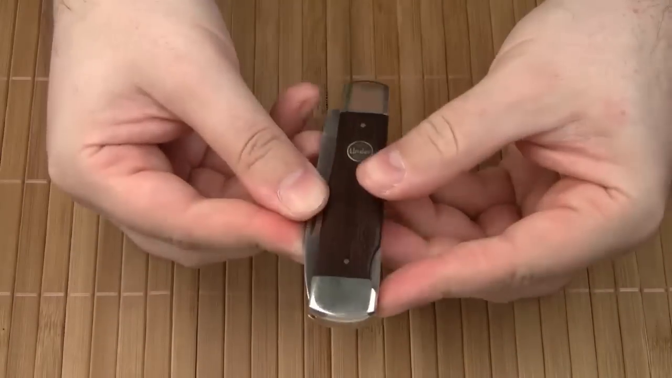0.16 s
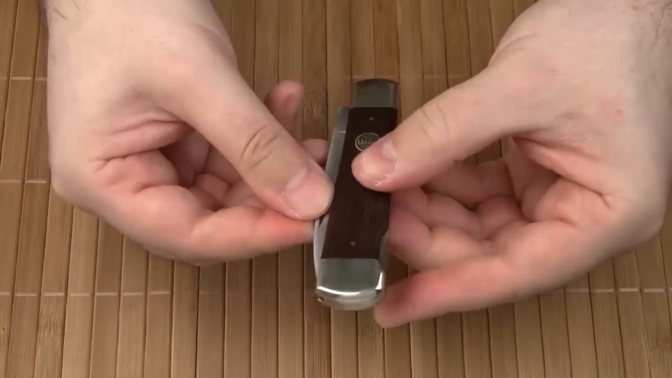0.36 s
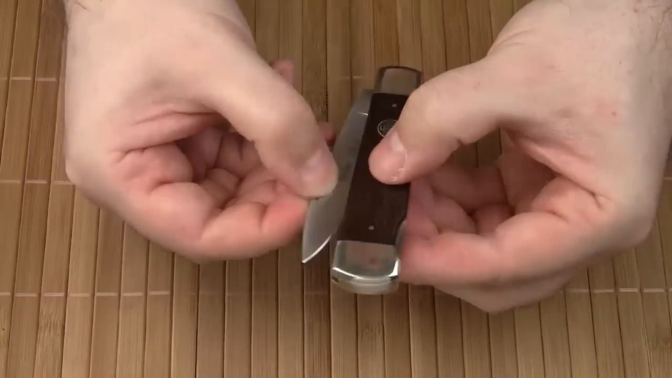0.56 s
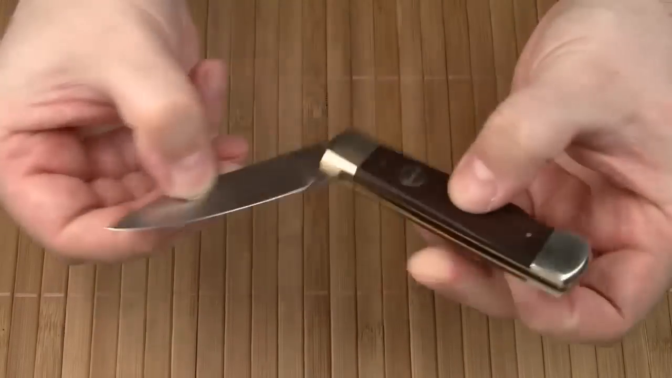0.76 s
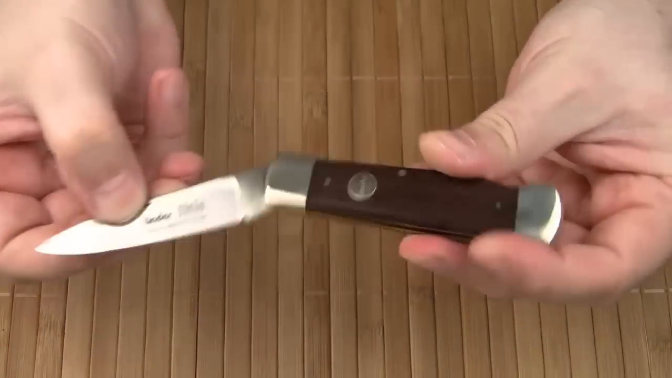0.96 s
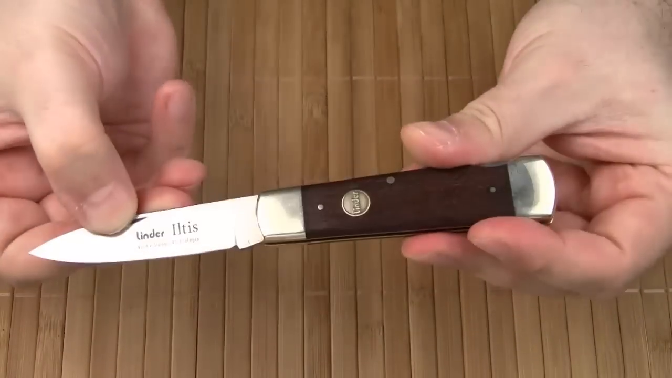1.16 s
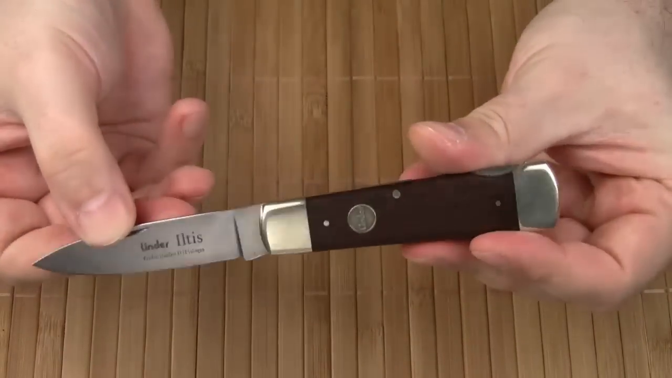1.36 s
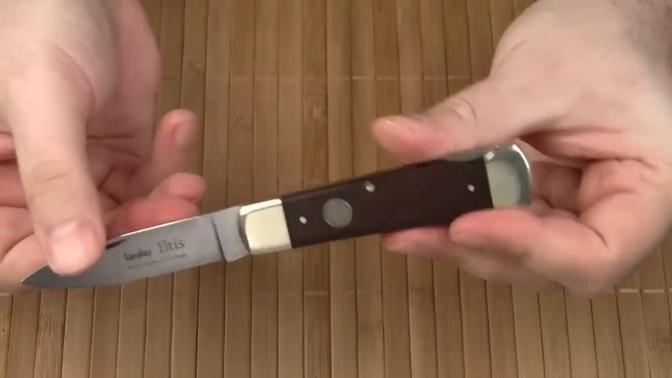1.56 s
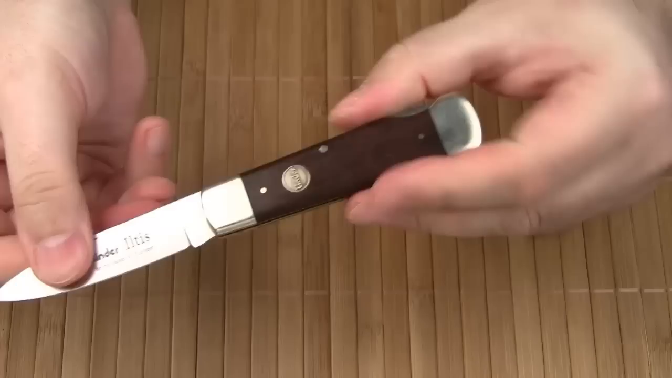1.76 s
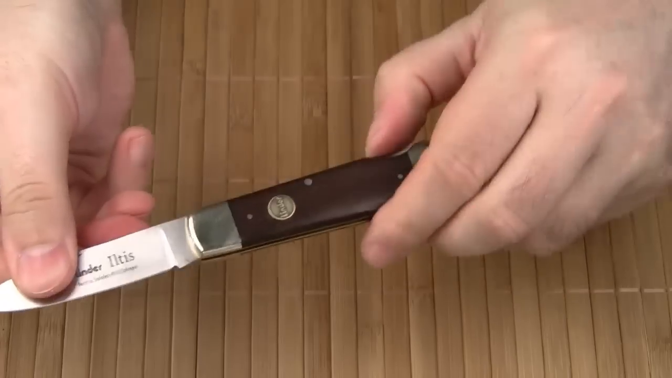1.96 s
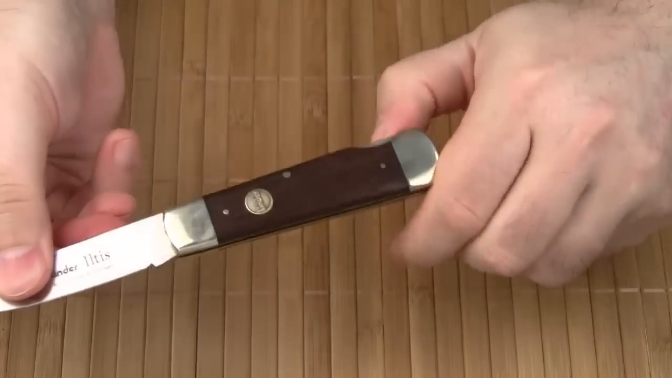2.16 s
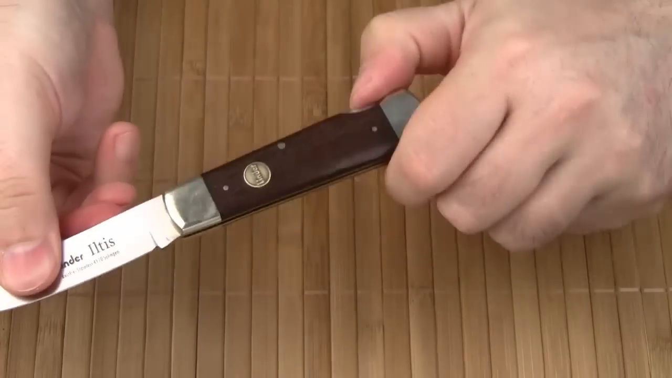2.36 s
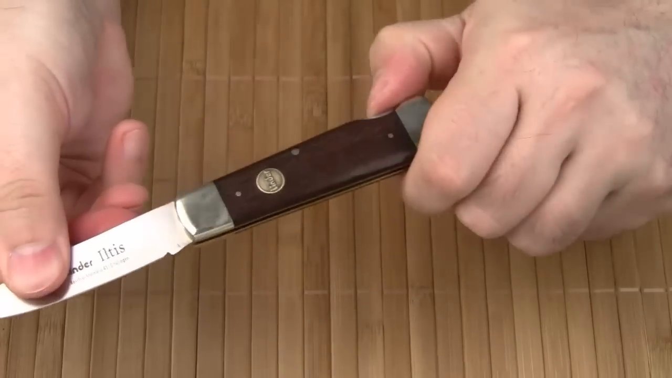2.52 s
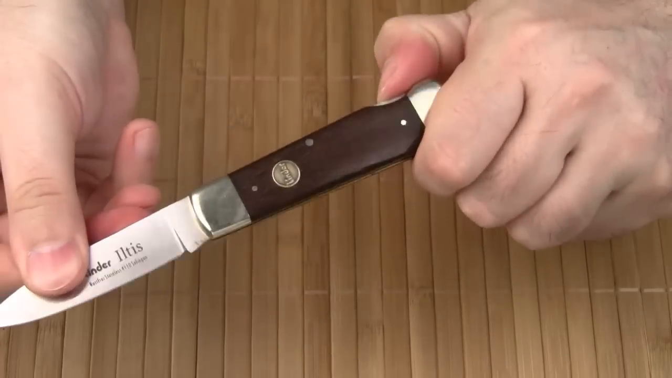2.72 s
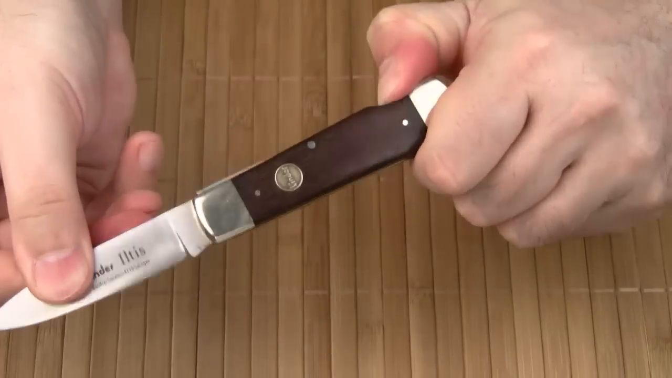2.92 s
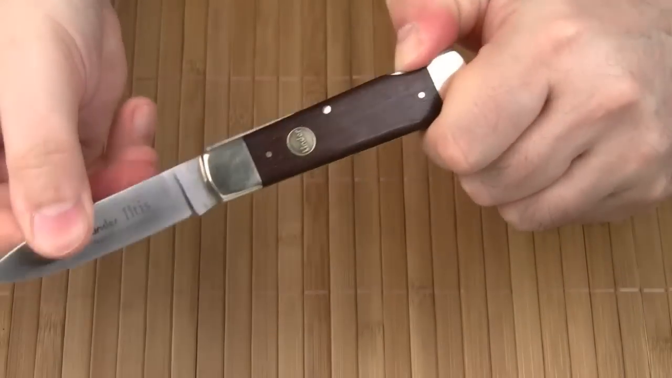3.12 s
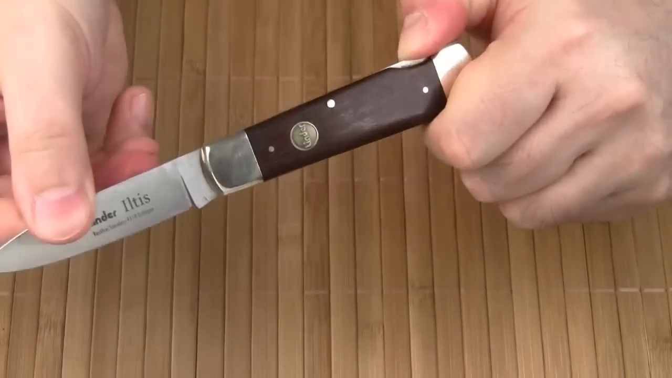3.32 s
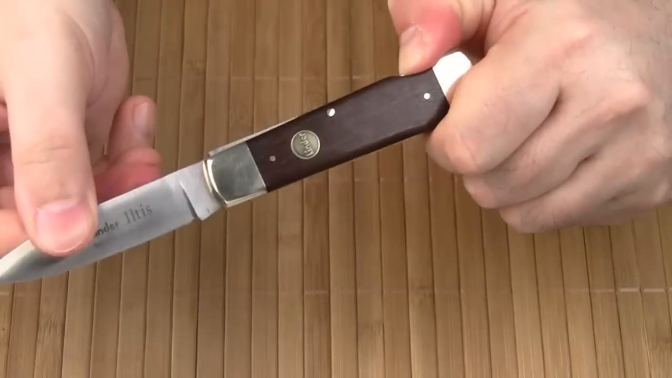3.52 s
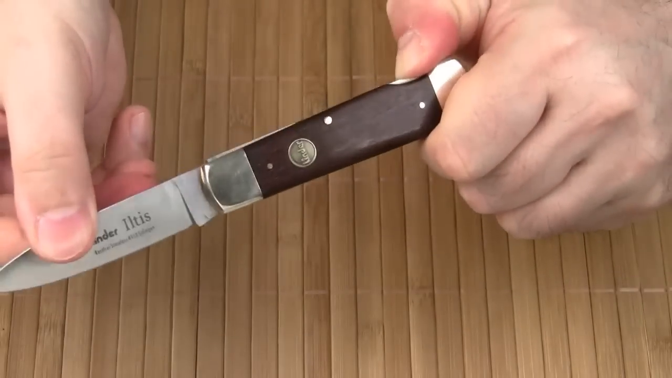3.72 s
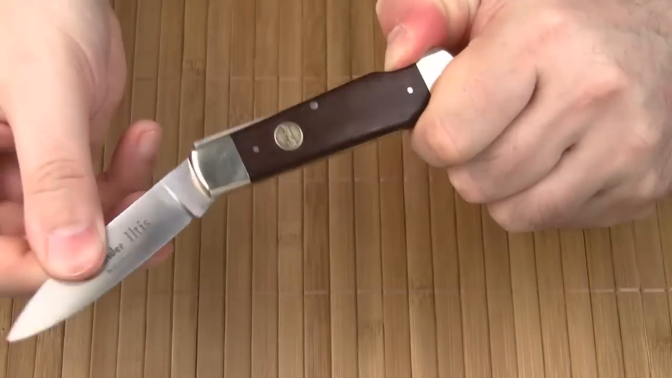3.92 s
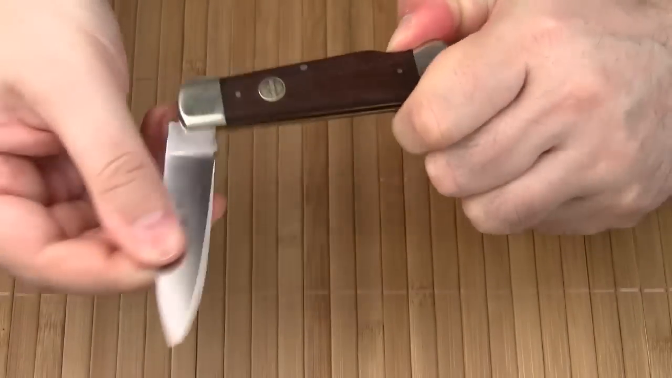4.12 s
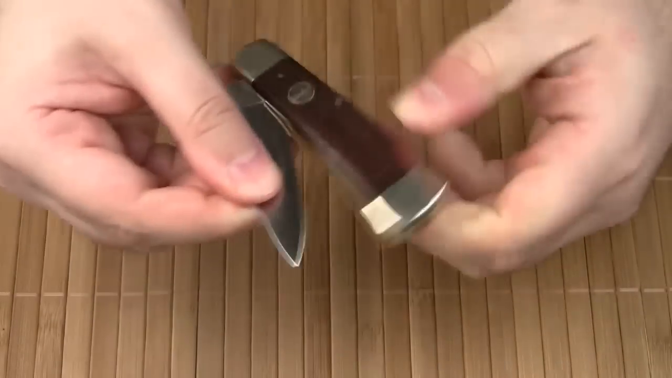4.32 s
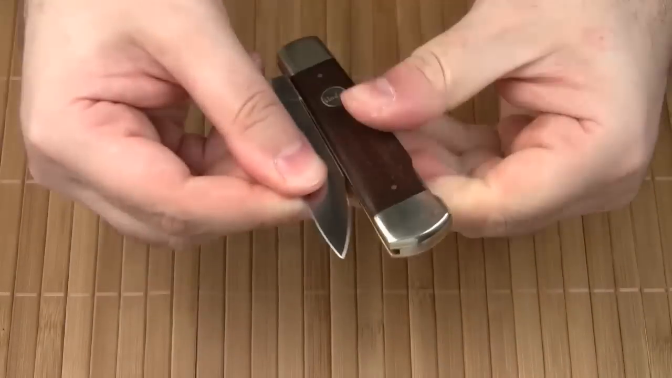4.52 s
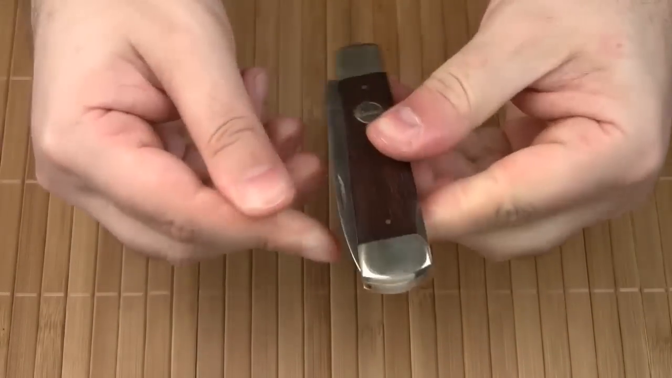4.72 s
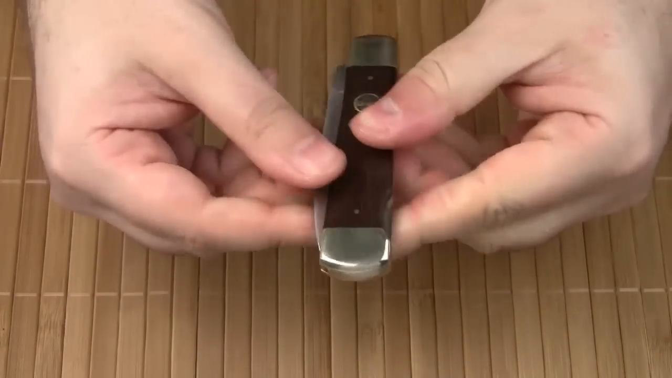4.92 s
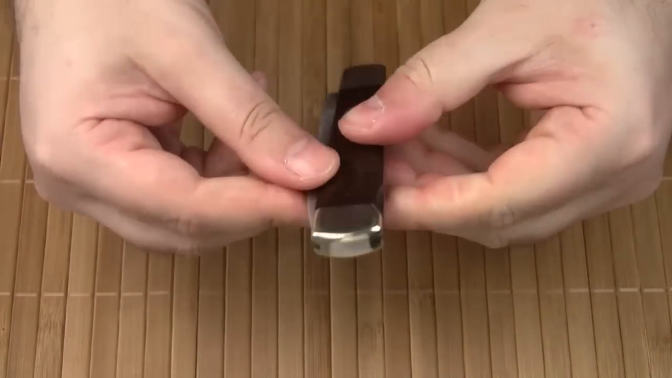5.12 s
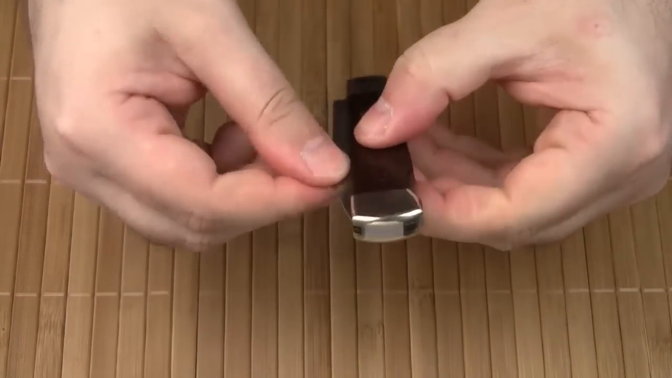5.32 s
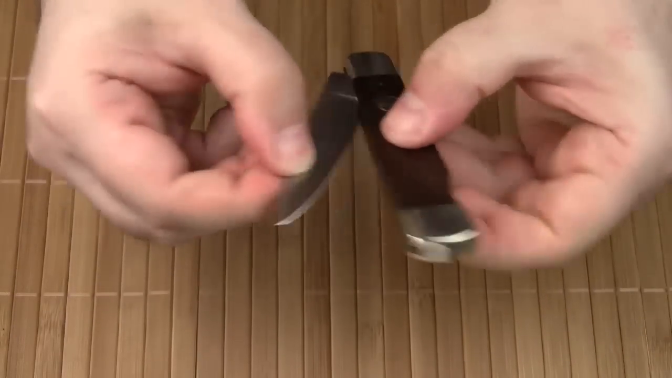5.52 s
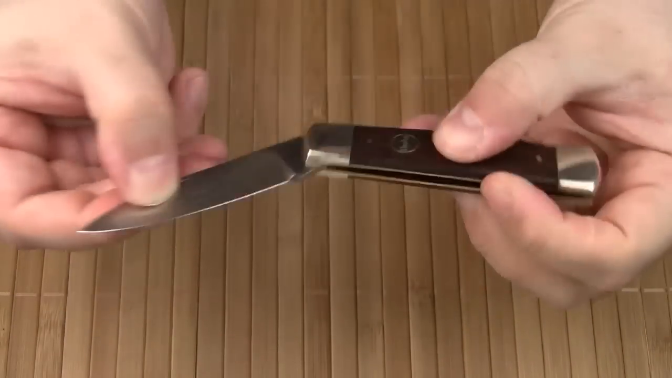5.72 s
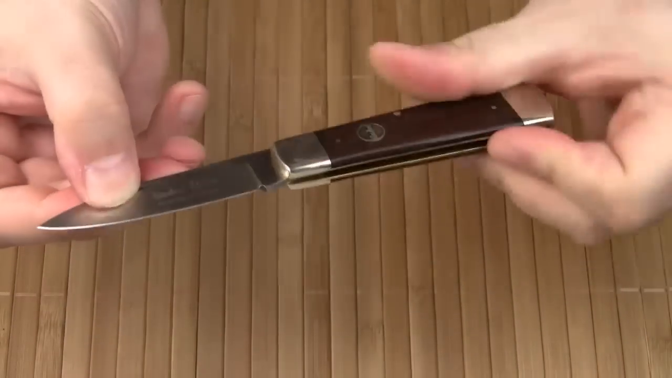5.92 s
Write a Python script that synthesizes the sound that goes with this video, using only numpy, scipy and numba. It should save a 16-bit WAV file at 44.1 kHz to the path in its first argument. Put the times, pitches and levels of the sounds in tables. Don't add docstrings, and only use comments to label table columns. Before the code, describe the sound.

Hands handle a pocket knife very close to a stereo microphone. A nail stutters faintly, then the blade locks open with a bright, overloaded snap. Three small lock ticks follow, the blade claps shut more softly, fingers fidget, a faint pivot squeak sounds, and a second loud snap locks it open. A small room answers each click over low hum, rumble and hiss.

```python
import sys
import numpy as np
from scipy import signal
from scipy.fft import rfft, irfft, next_fast_len
from scipy.io import wavfile
from scipy.ndimage import uniform_filter1d
from numba import njit

SR = 44100
rng = np.random.default_rng(int(sys.argv[2]) if len(sys.argv) > 2 else 0)


def dump(signal):
    limited = np.clip(np.atleast_2d(signal).T, -1, 1)
    pcm = np.round(limited * 32767).astype(np.int16)
    wavfile.write(sys.argv[1], SR, pcm)


def natural_amplitude(level_db):
    exponent = np.asarray(level_db, float) / 20
    return 10 ** exponent


N = 267951

LOCK_HZ, LOCK_S = 5890, 1.1065
SLOT_HZ, SLOT_WIDTH_HZ = 4520, 290
FAINT_SCRAPE_DB = -58

# (pitch_hz, width_hz, front_level_db, wall_level_db)
FIRST_OPEN_MODES = [(477, 670, -18.5, -30.5), (1419.5, 450, -23, -22), (1800, 400, -28, -12),
                    (2750, 400, -18.5, -20), (3400, 380, -18, -6.5), (4270, 430, -19, -3.5),
                    (LOCK_HZ, 331, 0, 1), (6800, 400, -17, -11), (8150, 800, -16, -13),
                    (8950, 500, -18, -14), (9950, 800, -17, -12), (11500, 1000, -20, -21),
                    (12800, 600, -20, -24), (14000, 900, -21, -25)]
SECOND_OPEN_MODES = [(815, 900, -15, -40), (1541, 310, -9, -4), (2182, 480, -19, -38), (3170, 560, -5, -4),
                     (3760, 740, -1.5, -24), (4390, 560, 0, -3), (6930, 400, -1.5, -12),
                     (8150, 250, -11, -6.5), (9325, 400, -2.5, -6.5), (11050, 400, -10, -17),
                     (12200, 710, -15, -18), (13130, 450, -12, -9.5), (14400, 770, -15, -25),
                     (15450, 460, -14, -33.5)]
LATCH_MODES = [(817, 280, -13.5, -30), (5650, 290, 0, -3), (5950, 550, -0.5, 2), (7350, 600, -7, -15),
               (10470, 500, -13.5, -11.5)]
SHUT_MODES = [(768, 299.5, -23, -37.5), (1330.5, 296, -23, -41.5), (1820, 300, -18, -35.5),
              (2400, 700, -21, -33), (3850, 500, -7, -26), (SLOT_HZ, SLOT_WIDTH_HZ, 0.96, 5),
              (5150, 500, -3, -12), (6325.5, 559.5, -2.5, -9.5), (7780, 650, 0, -4), (9016, 299.5, 3, -2),
              (9899, 701.5, -18, -22.5), (10400, 900, -20, -22.5), (12481, 576.5, -20.5, -12.5),
              (13900, 500, -13, -19.5), (15320, 500, -14.5, -30)]
NAIL_MODES = [(825, 240, 0, -26), (1291, 220, -2, -18), (2030, 330, -0.5, -2.5), (2843, 500, -6.5, -9.5),
              (4330, 520, 3.5, -1), (5300, 750, -2, -5.5), (7290, 520, -9, -12), (8530, 860, -17.5, -18),
              (11200, 1100, -22.5, -22.5), (13600, 570, -23, -26.5)]
FIRST_BAR_MODES = [(1118, 290, -24, -21), (1930, 500, -14, -9.5), (2796, 530, -9, -18),
                   (3900, 350, -10, -11), (4400, 350, -6, -6), (6170, 460, 2, -6), (7850, 420, -1.5, -8),
                   (9900, 550, -16, -14.5), (11500, 630, -22, -25), (13300, 1300, -17, -28.5)]
SECOND_BAR_MODES = [(1118, 400, -21, -25), (1913, 400, -15.5, -6), (2800, 600, -7.5, -14),
                    (4000, 700, -9.5, -9), (5670, 500, 0.5, -6), (6770, 370, 1, -4), (8170, 550, 0.5, -12),
                    (9800, 600, -13, -16), (12000, 700, -16, -25), (13600, 1000, -19, -28.5)]
THIRD_BAR_MODES = [(1118, 310, -30, -28), (1913, 400, -18, -14), (2900, 600, -10, -12),
                   (4300, 400, -2.5, -5), (5500, 600, -4, -8), (6900, 400, 2, -5), (8100, 600, -2.5, -14),
                   (9500, 600, -11.5, -16), (12100, 600, -20, -25), (13300, 900, -14, -28.5)]
# (start_s, peak_db, echo_delay_ms, echo_db, scrape_db)
FIRST_OPEN_HIT = [
    (LOCK_S, 6, .63, -12, -52),
]
SECOND_OPEN_HIT = [
    (5.892, 5, .63, -11, -50.5),
]
LATCH_HIT = [
    (5.8928, 3, .63, -12, FAINT_SCRAPE_DB),
]
SHUT_HIT = [
    (4.7665, -1.5, .65, -2.5, FAINT_SCRAPE_DB),
]
FIRST_BAR_HIT = [
    (3.0964, -17.5, 0.62, -7.5, -55),
]
SECOND_BAR_HIT = [
    (3.3988, -17.5, 0.5, -7, -56),
]
THIRD_BAR_HIT = [
    (3.7041, -13.5, 0.7, -9, -48),
]
# (modes, hits, scrape_ms, free_ring_ms, crack_db, wash_db, echo_bass_db)
SNAPS = [
    (FIRST_OPEN_MODES, FIRST_OPEN_HIT, 18, 1.6, -15, 5, -.1),
    (SECOND_OPEN_MODES, SECOND_OPEN_HIT, 17, .7, -12, 4, -.1),
    (LATCH_MODES, LATCH_HIT, 4, 1.1, -15, 3, -.1),
    (SHUT_MODES, SHUT_HIT, 4, .15, -10, .5, -13),
    (FIRST_BAR_MODES, FIRST_BAR_HIT, 11, .3, -7, 3, -3),
    (SECOND_BAR_MODES, SECOND_BAR_HIT, 11, .3, -7, 3, -3),
    (THIRD_BAR_MODES, THIRD_BAR_HIT, 11, .3, -8, 3, -3),
]
NAIL_SLIPS = [.4044, .412, .4544, .4628, .4718, .481, .491, .5043, .5174, .5297, .5426, .5599, .5911, .6004]
# (time_s, peak_db)
NAIL_PULL = [(.404, -52), (.412, -43), (.454, -46), (.481, -34.5), (.53, -26), (.591, -24.5), (.6, -26.5)]
# (start_s, length_ms,
# level_db, centre_hz, width_hz)
SHORT_DRAGS = [(.4081, 7, -60, 2050, 400), (1.0851, 19, -51, 8050, 900), (5.0001, 30, -60, 5130, 800),
               (5.5101, 50, -64, 1385, 250), (5.4921, 13, -59, 5100, 500), (5.5151, 44, -62, 830, 480),
               (5.5201, 28, -54.5, 4500, 1400), (5.7758, 5, -50.5, 1300, 260), (5.7758, 5.6, -55, 3720, 328),
               (5.7961, 6, -55.5, 1500, 445), (5.7961, 6, -59, 3720, 320), (1.1054, 1.2, -21.5, 1500, 340),
               (5.7011, 7, -56, 1750, 300), (5.6761, 8, -59, 1800, 310), (5.4691, 4, -57, 7500, 2000),
               (5.8913, 0.8, -18.5, 3000, 1500), (5.8761, 4.1, -50, 3700, 600), (5.8721, 15, -54, 8150, 900),
               (.1461, 3, -50, 7500, 2500), (3.9813, 4, -41, 5900, 400), (3.9813, 4, -49, 4600, 400),
               (3.9813, 3, -48, 10200, 2000), (3.9813, 3, -54, 13000, 1200)]
# (start_s, peak_db, centre_hz, low_knock_db)
TICKS = [(0.146, -37, 5000, -6.5), (3.287, -41, 4340, -16), (3.315, -52, 4700, -9),
         (3.5066, -40, 4940, -26), (3.5274, -41.5, 5000, -7.5), (3.8294, -50, 7460, -17),
         (3.9812, -38, 5900, -30), (4.2662, -52, 6750, -26), (4.283, -44.5, 5900, -24.5),
         (4.4459, -42.5, 7050, -8), (4.5179, -45.5, 4030, -11), (4.9821, -51, 4730, 2),
         (5.1106, -52, 4960, -11), (5.1864, -55.5, 6990, -15), (5.2847, -45, 6200, -22),
         (5.3343, -45.5, 6700, -1.5), (5.3663, -43.5, 5470, -36), (5.3774, -44, 5740, -27),
         (5.3871, -41.5, 6350, -8), (5.4191, -41.5, 6500, -3.5), (5.44, -40, 5660, -7),
         (5.4763, -28.5, 4940, -7), (5.5975, -51, 6520, -9.5), (5.6917, -41, 6000, -19),
         (5.7074, -41, 7560, -15), (5.729, -48, 5200, -17), (6.063, -40, 4420, -2)]
# (fastest_s, rise_s, fall_s, swish_db, rub_db)
STROKES = [(.08, 0.22, 0.26, -72, -79), (0.289, 0.033, 0.079, -69, -78), (.69, 0.12, 0.25, -69, -73),
           (0.847, 0.08, .06, -54.5, -63), (1.05, 0.11, 0.1, -69.5, -71), (1.71, .2, 0.12, -71.5, -77.5),
           (1.88, 0.11, 0.36, -62, -69), (2.22, .05, 0.14, -73.5, -87), (2.57, .12, .12, -70.5, -78),
           (2.99, .3, 0.19, -70, -69), (3.2, .05, 0.25, -78, -77), (3.48, 0.051, .2, -76, -75),
           (3.83, 0.058, .25, -79.5, -86), (4.39, .3, 0.15, -59, -65), (4.53, 0.036, .08, -69, -74),
           (4.66, .08, .12, -68.5, -76), (5.02, .04, .12, -71, -85), (5.4, 0.29, .12, -72, -72),
           (5.535, 0.085, 0.16, -73.5, -58), (5.69, .2, 0.17, -60.5, -64.5), (5.86, .1, 0.032, -69, -70.5)]
# (start_s, length_ms, level_db, centre_hz,
# width_hz)
LOW_BUMPS = [(1.03, 75, -49.5, 98, 60), (1.1045, 6.2, -32, 221.4, 259), (1.12, 79, -47, 96, 50),
             (1.22, 45, -51.5, 125, 100), (2.0, 130, -63, 370, 250), (2.96, 80, -51.5, 90, 60),
             (5.2, 80, -57.5, 152, 120), (5.36, 100, -54, 101, 82), (6.01, 51, -64, 117, 120),
             (5.8918, 2.93, -26.5, 190, 340), (4.7665, 4.6, -45, 300, 400)]
# (delay_ms, level_db)
TABLE_ECHOES = [(2.1, -19.5), (4.1, -16.5), (5.9, -20)]
# (pitch_hz, t60_s, level_db)
ROOM_TAIL = [(499.3, .3, -40.5), (1468, 0.57, -33.5), (3570, 0.43, -27.5), (6000, 0.44, -25.5),
             (8990, 0.39, -29), (12000, 0.27, -32.5), (15000, .22, -48)]
# (pitch_hz, level_db)
PORT_DIFFERENCE = [(60, -4), (110, -10.5), (200, -13), (380, -14.5), (700, -15.5), (1290, -22.5),
                   (2380, -19), (4400, -24.5), (8120, -23), (15000, -15.5)]
# (time_s, level_db)
KNIFE_TURN = [(.6, -11), (1.1, 2), (3.1, -8.5), (4.77, -7), (5.89, -13.5)]
# (pitch_hz, level_db)
AIR_COLOUR = [(12, -45.5), (20, -11.5), (108, -3.5), (194, -5), (242, -13), (295, -10), (339, -15),
              (1100, -25), (2350, -28.5), (2560, -26), (3200, -30), (6630, -33), (12300, -38.5),
              (14500, -41.5), (16300, -79)]
# (pitch_hz, level_db)
HISS_COLOUR = [(12, -39), (20, -10.5), (71, 1.5), (217, 2), (249, 0), (582, -2.5), (9800, -9.5),
               (11900, -23.5), (14000, -54.5)]
# (pitch_hz, level_db)
FLOOR_MODES = [(30, -4), (48, 3.5), (63, -6.5), (88, 2.5), (130, 0)]
# (peak_s, length_s, lift_db)
FOREARM_SHIFTS = [(1.166, .2, 4), (1.969, 0.22, 1.5), (4.458, 0.3, 1), (5.408, 0.11, 6), (6.07, 0.24, 8.5)]
# (start_s, level_db)
MATRIX_SPITS = [(1.10712, -5.5), (1.10745, -9)]


def unit(x):
    return x / np.sqrt(np.mean(x ** 2))


def shaped(x, points):
    hz, db = np.transpose(points)
    n = next_fast_len(len(x))
    f = np.maximum(np.fft.rfftfreq(n, 1 / SR), 1)
    gain = natural_amplitude(np.interp(np.log(f), np.log(hz), db))
    return irfft(rfft(x, n) * gain, n)[:len(x)]


def band(x, lo_hz, hi_hz):
    sos = signal.butter(2, [lo_hz, min(hi_hz, .45 * SR)], "band", fs=SR, output="sos")
    return signal.sosfilt(sos, x)


def walk(rate_hz):
    k = int(SR / rate_hz)
    return unit(uniform_filter1d(uniform_filter1d(rng.standard_normal(N), k), k))


def add(out, s, sound):
    i = int(s * SR)
    out[..., i:i + sound.shape[-1]] += sound[..., :N - i]


def strike(modes, db, echo_ms, echo_db, spread_db, free_ms, crack_db, wash_db, echo_bass_db):
    t = np.arange(900) / SR
    luck = rng.standard_normal((len(modes), 2))
    hz, width, front_db, wall_db = np.transpose(modes)[:, :, None]
    sign = (-1) ** np.arange(len(modes))[:, None]
    strength = sign * natural_amplitude(spread_db * luck[:, :1]) * width
    swing = strength * np.sin(2 * np.pi * hz * (1 + spread_db * luck[:, 1:] / 150) * t)

    held = np.maximum(t - free_ms / 1000, .15 * t)
    decay = np.exp(-np.pi * width * held) / (1 + np.pi * width * free_ms / 1000)
    front = np.sum(natural_amplitude(front_db) * swing * decay, axis=0)

    blur = .63 * np.maximum(hz / 5600, 1) ** 2.7
    walls = natural_amplitude(wall_db) * swing * blur ** 0.84 * np.exp(-np.pi * width * blur * t)
    walls = walls * natural_amplitude(wash_db) / np.max(np.abs(walls.sum(axis=0)))

    crack = band(np.eye(1, len(t))[0], 2500, 15000)
    front = band(front, 200, 19000)
    front = front / np.max(np.abs(front)) + natural_amplitude(crack_db) * crack
    echo_colour = [(2000, echo_bass_db), (7000, 0.00039), (9600, 0.00013), (11000, echo_bass_db / 2)]
    echo = shaped(front, echo_colour)[:600]
    add(front, echo_ms / 1000, natural_amplitude(echo_db) * echo)

    crack_power = np.abs(natural_amplitude(crack_db - 8) * rfft(crack)) ** 2
    power = np.sum(np.abs(rfft(walls)) ** 2, axis=0) + crack_power
    all_round = np.roll(irfft(np.sqrt(power), len(t)), shift=120)
    return natural_amplitude(db) * np.array([front, all_round])


def scrape(length_ms, db):
    ramp = np.linspace(0, 1, int(length_ms * SR / 1000))
    grit = rng.standard_normal(2000)[:len(ramp)]
    grit = band(grit, 2400, 3500) + .5 * band(grit, 4100, 8100)
    return natural_amplitude(db) * unit(grit) * np.minimum(3 * ramp, 1)


def snaps():
    out = np.zeros((2, N))
    last_lock_s = SECOND_OPEN_HIT[0][0]
    for modes, hits, scrape_ms, *character in SNAPS:
        for s, db, echo_ms, echo_db, scrape_db in hits:
            front, walls = strike(modes, db, echo_ms, echo_db, 0., *character)
            add(out[0], s, front)
            add(out[1], min(s, last_lock_s), walls)
            rise = scrape(scrape_ms, scrape_db)
            add(out, s - len(rise) / SR, rise)
    return out


def nail_slips():
    out = np.zeros((2, N))
    for s, db in zip(NAIL_SLIPS, np.interp(NAIL_SLIPS, *np.transpose(NAIL_PULL))):
        slip = strike(NAIL_MODES, db, echo_ms=0.76, echo_db=-5, spread_db=1.2, free_ms=0.2,
                      crack_db=-15, wash_db=1.5, echo_bass_db=-9)
        add(out, s + .0005, slip)
    return out


def drags(table):
    out = np.zeros(N)
    longest = 12000
    for s, ms, db, hz, width_hz in table:
        unevenness_db = 25 * uniform_filter1d(rng.standard_normal(longest), size=200)
        grit = rng.standard_normal(longest) * natural_amplitude(unevenness_db)
        n = int(ms * SR / 1000)
        lo_hz, hi_hz = max(hz - width_hz / 2, 20), hz + width_hz / 2
        rub = unit(band(grit, lo_hz, hi_hz)[-n:]) * signal.windows.tukey(n, .5)
        add(out, s, natural_amplitude(db) * band(np.pad(rub, (0, longest)), lo_hz / 2, hi_hz * 2))
    return out


def squeak():
    start_s, length_s = 5.545, .185
    pitch_hz, sag_hz_per_s = 1910, 800
    age = np.arange(N) / SR - start_s
    unsteady_hz = (pitch_hz - sag_hz_per_s * age) * (1 + 0.021 * walk(470))
    phase = 2 * np.pi * np.cumsum(unsteady_hz) / SR
    gate = np.clip(np.minimum(age, length_s - age) / 0.0092, 0, 1)
    gate = gate * natural_amplitude(-63.5 + 4 * walk(90))
    octave_db = 4.5 - 110 * np.maximum(age, 0)
    return gate * (np.sin(phase) + natural_amplitude(octave_db) * np.sin(2 * phase))


def ticks():
    out, t = np.zeros(N), np.arange(700) / SR
    t60_ms, half_width = 8.1, 0.67 / 2
    for s, db, hz, knock_db in TICKS:
        burst = rng.standard_normal(len(t)) * np.exp(-np.log(1000) * t * 1000 / t60_ms)
        bright = band(burst, hz / (1 + half_width), hz * (1 + half_width))
        bright = bright + natural_amplitude(-23) * band(burst, 8500, 14500)
        dull = band(burst, 540, 1740)
        bright = bright / np.max(np.abs(bright))
        dull = dull / np.max(np.abs(dull))
        add(out, s, natural_amplitude(db) * (bright + natural_amplitude(knock_db) * dull))
    return out


def skin_grain():
    return rng.standard_normal(N) * natural_amplitude(1.3 * walk(200))


def fingers():
    t = np.arange(N) / SR
    swish = 0
    for hz in 3200 * 2 ** np.arange(0, 2.2, .35):
        octaves = np.log2(hz / 7000)
        layer_db = -3.5 * octaves
        layer_gain = natural_amplitude(layer_db - 5.7 * octaves ** 2)
        swish = swish + layer_gain * unit(band(skin_grain(), hz / 1.01, hz * 1.43)) / 2
    rub = unit(band(skin_grain(), 470, 2300))

    swish_gain, rub_gain = 0, 0
    for s, rise, fall, swish_db, rub_db in STROKES:
        distance = np.maximum((s - t) / rise, (t - s) / fall)
        speed = natural_amplitude(-19 * distance ** 1.315)
        swish_gain = swish_gain + natural_amplitude(swish_db) * speed
        rub_gain = rub_gain + natural_amplitude(rub_db) * speed
    return band(swish_gain * swish + rub_gain * rub, 300, 13500)


def near_reflections():
    near = np.zeros(600)
    near[0] = 1
    for ms, db in TABLE_ECHOES:
        add(near, ms / 1000, natural_amplitude(db) * band(np.eye(1, 100)[0], 2200, 11000))
    ms = np.arange(len(near)) * 1000 / SR
    scatter = rng.standard_normal(len(near)) * (ms > 1.5) * (ms < 8.5) * natural_amplitude(-4 * ms)
    scatter = band(scatter, 2300, 14000)
    return near + natural_amplitude(-13) * scatter / np.linalg.norm(scatter)


def room():
    t = np.arange(int(.7 * SR)) / SR
    noise, tail = rng.standard_normal(len(t)), 0
    hz, t60, db = np.transpose(ROOM_TAIL)
    for c in 300 * 2 ** (np.arange(24) / 4):
        part = shaped(noise, [(c / 1.2, -60), (c / 1.15, -9), (c, 0), (c * 1.15, -9), (c * 1.2, -60)])
        decay = np.exp(-np.log(1000) * t / np.interp(c, hz, t60))
        tail = tail + natural_amplitude(np.interp(c, hz, db)) * part * decay
    build_up = np.clip(t * 1000 / 24, 0, 1) ** 0.77
    return natural_amplitude(-22.0) * tail * build_up


def background():
    t = np.arange(N) / SR
    air = shaped(rng.standard_normal(N), AIR_COLOUR)
    high = natural_amplitude(-63) * unit(band(air, 370, 19000))

    low = shaped(band(band(air, 15, 300), 15, 300), FLOOR_MODES)
    lift_db = sum(db * np.exp(-((t - s) / length) ** 2) for s, length, db in FOREARM_SHIFTS)
    rumble = low / np.std(band(low, 78, 150)) * natural_amplitude(-62 + lift_db + 1.0 * walk(12))

    fan_gain = np.sqrt(2) * natural_amplitude(-60 + 0.91 * walk(11.0))
    fan_hz = 245 + 0.93 * walk(3.3)
    fan = fan_gain * np.sin(2 * np.pi * np.cumsum(fan_hz) / SR)

    side_hiss = natural_amplitude(-70) * unit(shaped(rng.standard_normal(N), HISS_COLOUR))
    return high + rumble + fan, side_hiss


def scene():
    knife, all_round = snaps() + nail_slips() + drags(SHORT_DRAGS) + squeak() + ticks() + fingers()
    mid = signal.fftconvolve(knife, near_reflections())[:N]
    mid = mid + signal.fftconvolve(all_round, room())[:N] + drags(LOW_BUMPS)

    side = natural_amplitude(-42) * signal.fftconvolve(all_round, room())[:N]
    late_click = np.roll(np.clip(knife, -1, 1), shift=3)
    turn_db = np.interp(np.arange(N) / SR, *np.transpose(KNIFE_TURN))
    side -= natural_amplitude(turn_db) * band(shaped(late_click, PORT_DIFFERENCE), 60, 18000)

    floor, side_hiss = background()
    return mid + floor + (side + side_hiss) * np.array([[1], [-1]])


@njit
def limiter(peak, top, ratio, attack, release):
    gain, e = np.empty(len(peak)), 0.
    for i in range(len(peak)):
        e += (peak[i] - e) * (attack if peak[i] > e else release)
        gain[i] = min(1., (top / (e + 1e-9)) ** (1 - 1 / ratio))
    return gain


def roll_off(x):
    return signal.sosfilt(signal.butter(12, 16410, fs=SR, output="sos"), x)


def record(dry):
    lag_ms, attack_s, release_s = 1.4, .0055, .11
    peak = np.roll(np.max(np.abs(dry), axis=0), int(lag_ms * SR / 1000))
    gain = limiter(peak, natural_amplitude(-22), 12.0, 1 / (attack_s * SR), 1 / (release_s * SR))
    limited = dry * gain
    driven = np.clip(limited, -1.03, 1.03)

    spit = np.zeros(N)
    for s, db in MATRIX_SPITS:
        add(spit, s, natural_amplitude(db) * np.array([.4, 1, .4]))
    driven = driven - band(spit * driven, 500, 19000) + spit * np.array([[1], [-1]])
    driven = np.clip(driven, -1.03, 1.03)

    offset = np.mean(driven - limited, axis=0)
    driven = driven - shaped(offset, [(150, 0), (450, -30)])
    top_filter = signal.butter(12, 16300, fs=SR, output="sos")
    mix = signal.sosfiltfilt(top_filter, driven)
    return roll_off(mix)


dry = scene()
out = record(dry)
dump(out)
```